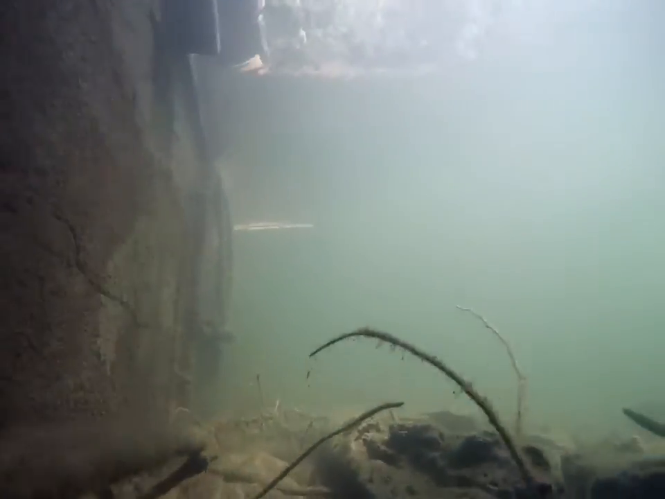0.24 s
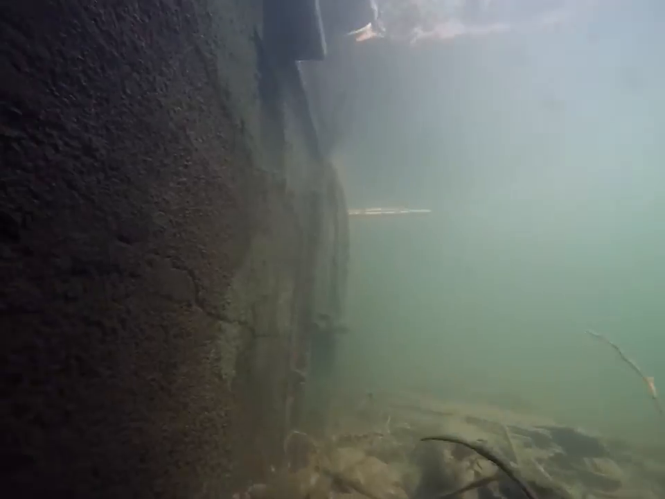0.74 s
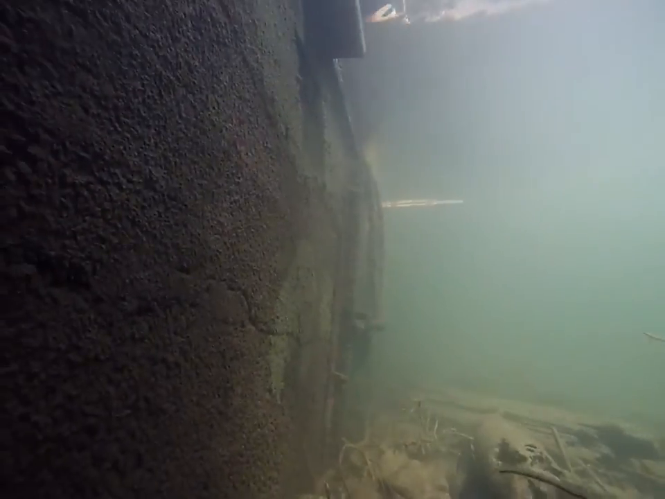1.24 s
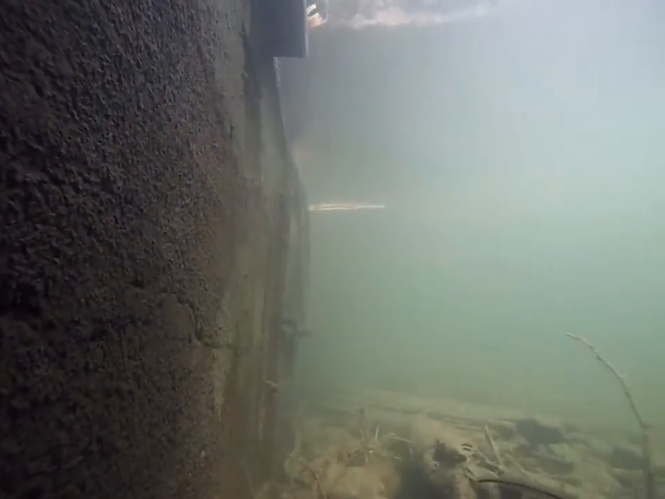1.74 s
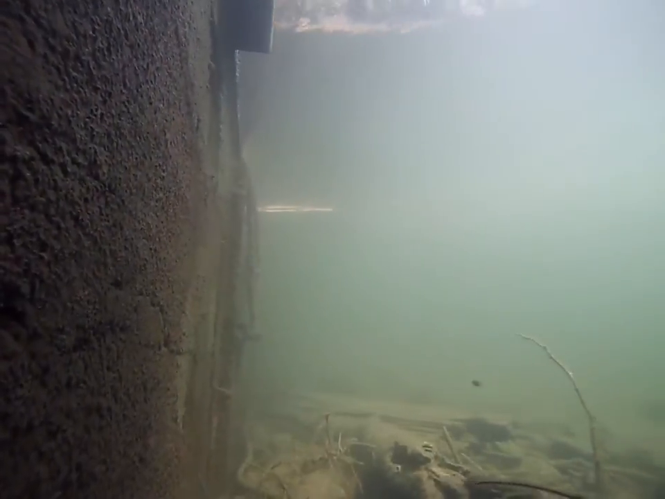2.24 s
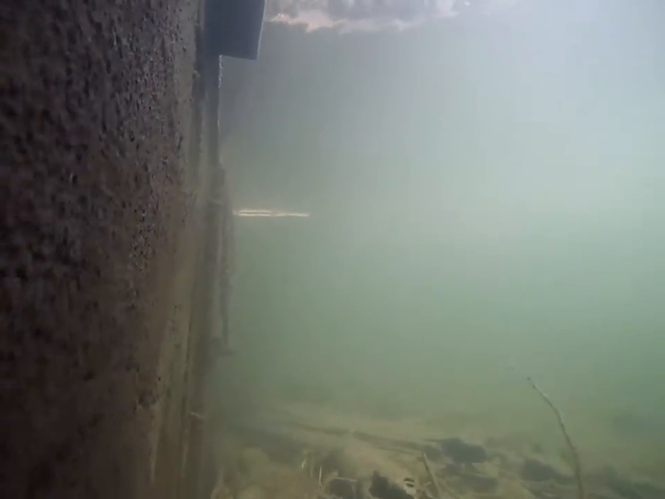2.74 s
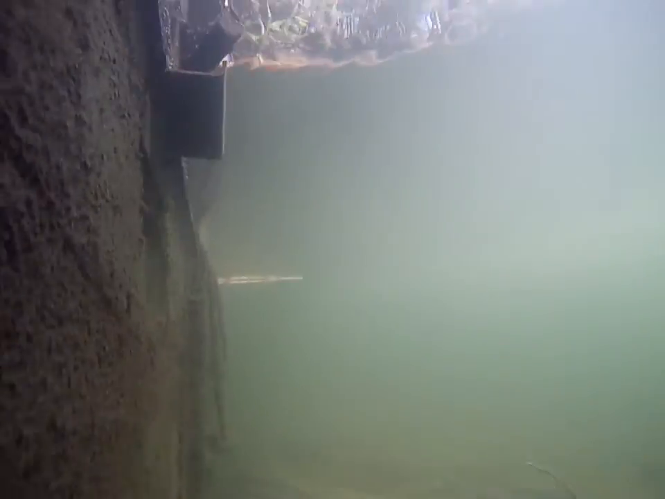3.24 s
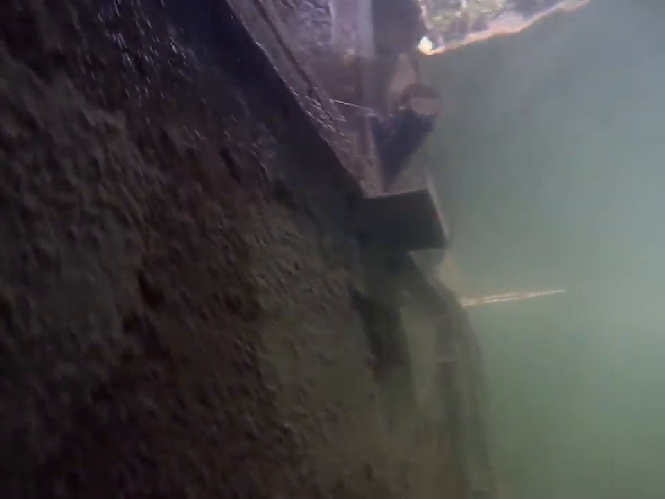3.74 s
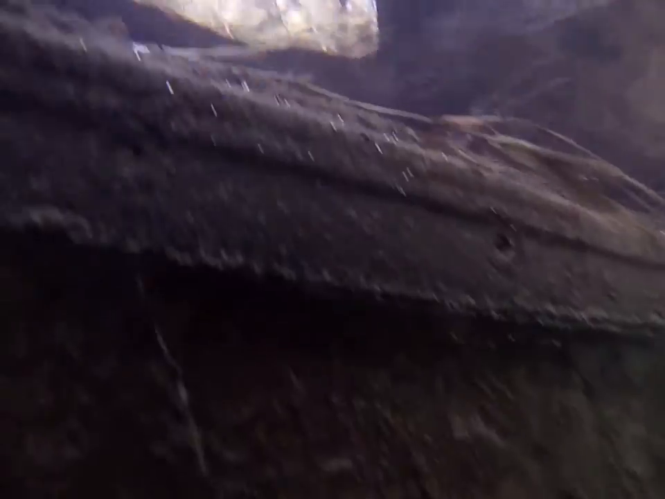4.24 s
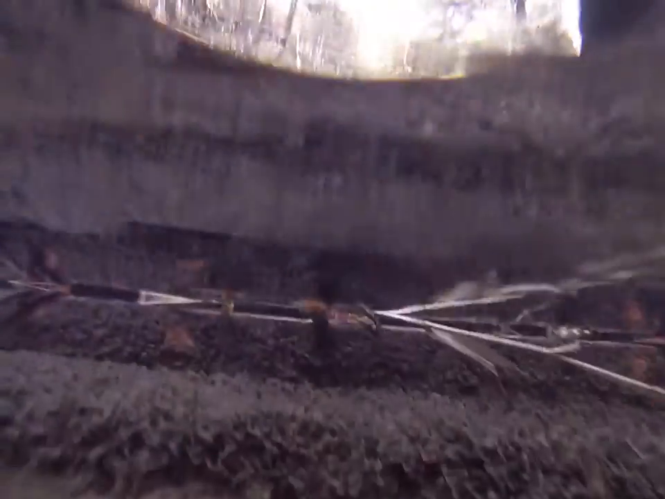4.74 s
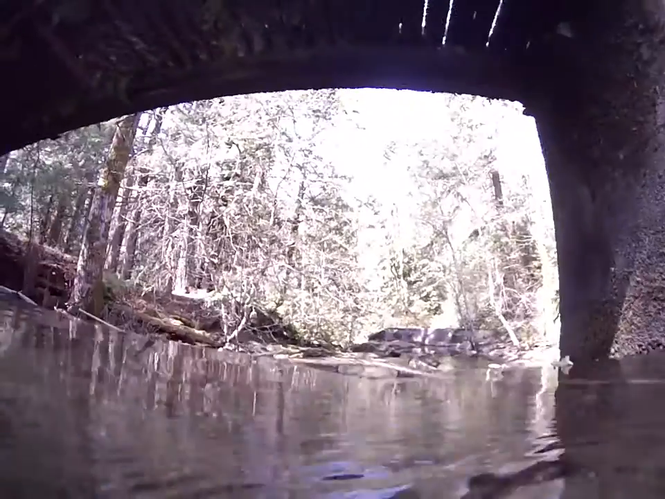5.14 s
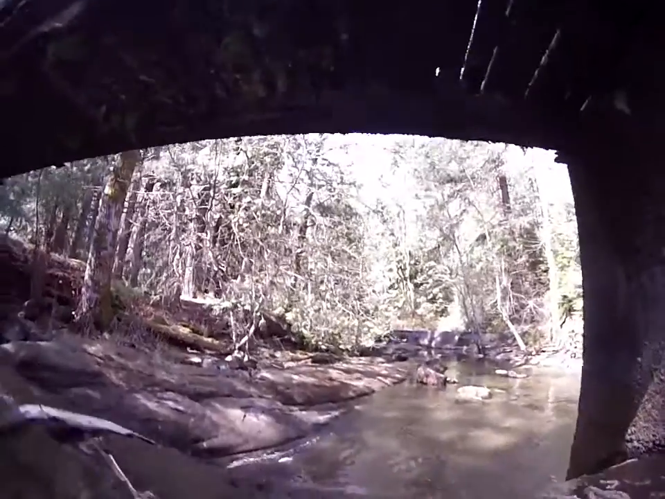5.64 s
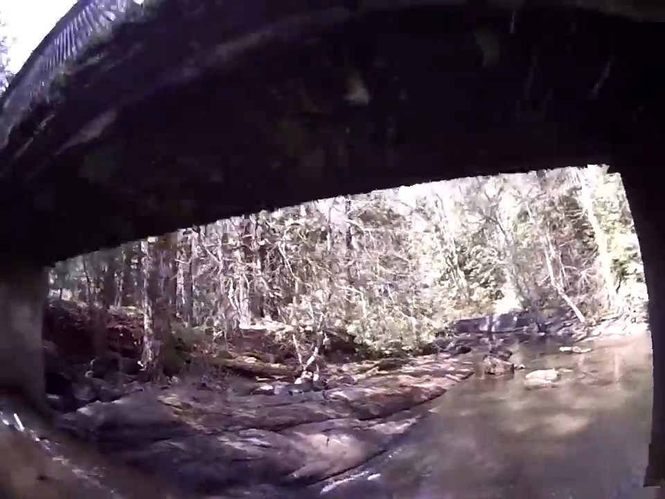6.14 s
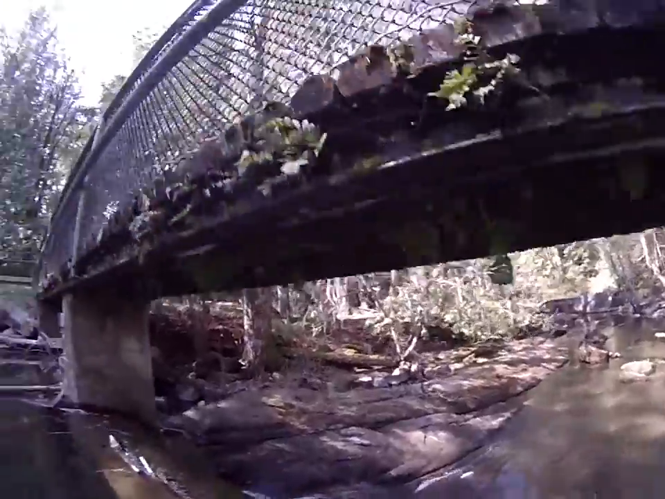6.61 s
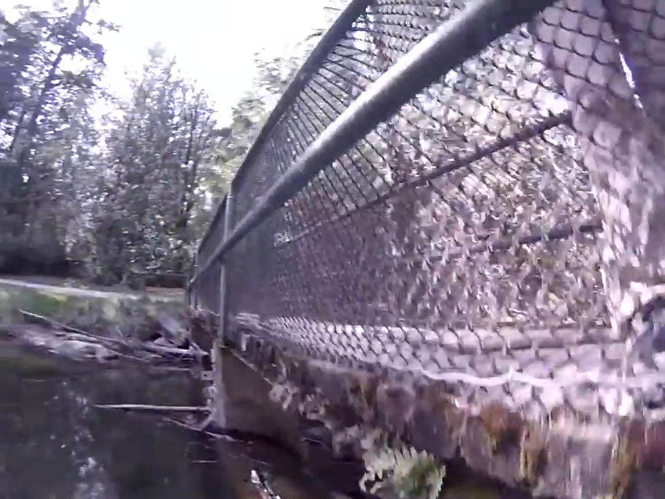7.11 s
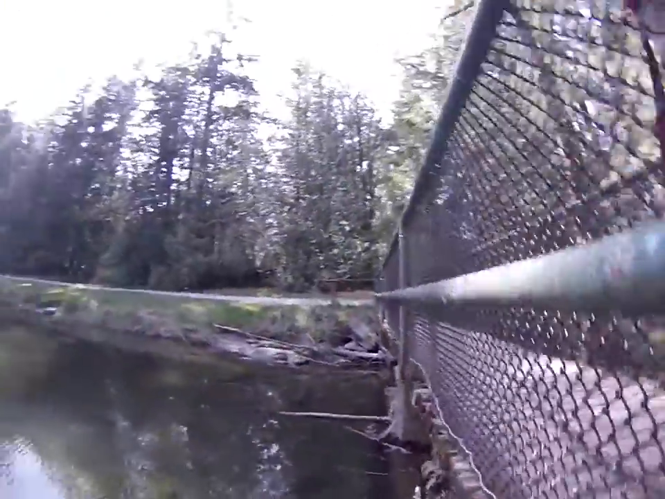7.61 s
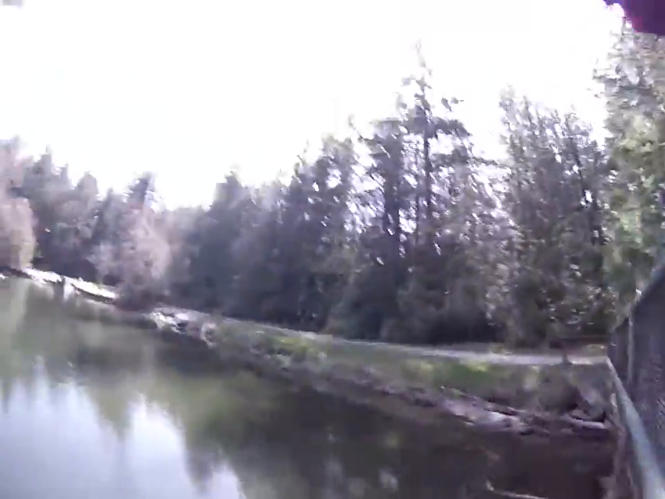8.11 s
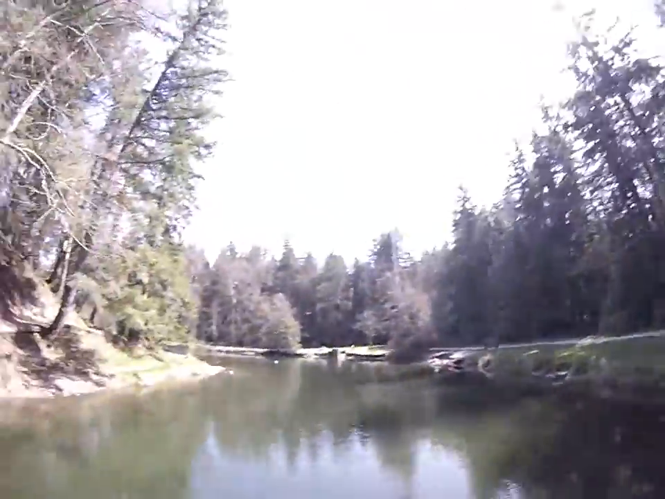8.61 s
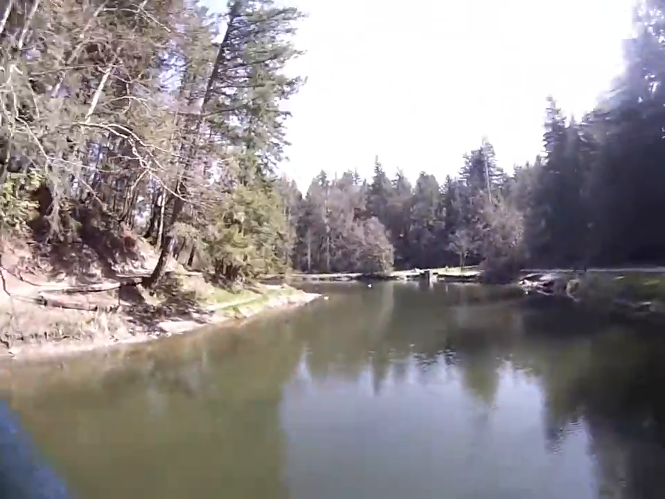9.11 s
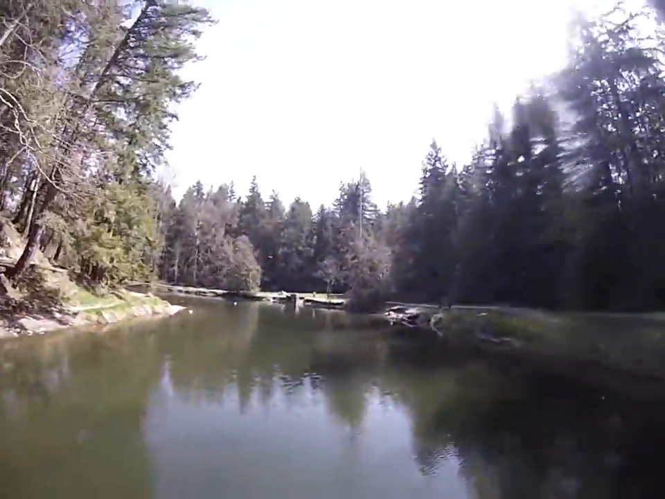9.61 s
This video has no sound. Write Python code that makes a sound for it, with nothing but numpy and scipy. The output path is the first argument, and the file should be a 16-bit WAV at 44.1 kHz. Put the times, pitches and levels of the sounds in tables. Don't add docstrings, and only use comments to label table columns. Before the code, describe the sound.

Heavy thumps on a submerged housing, dull underwater murmur with low pole hum, bubbly chirps and clicks on surfacing, then faint weir hiss and handling knocks.

```python
import sys
import numpy as np
from scipy import signal
from scipy.fft import rfft, irfft, next_fast_len
from scipy.io import wavfile
from scipy.ndimage import uniform_filter1d, map_coordinates

SR = 44100
rng = np.random.default_rng(int(sys.argv[2]) if len(sys.argv) > 2 else 0)


def how_loud(loudness_db):
    steps = np.asarray(loudness_db, float) / 20
    return 10 ** steps


def to_wav(sig):
    pcm = np.clip(np.atleast_2d(sig), -1, 1) * 32767
    pcm = np.round(pcm).astype(np.int16)
    wavfile.write(sys.argv[1], SR, pcm.T)


N = 434804
SURFACE_S, CROSSING_S = 5.02, 0.3

# (f/Hz, width/Hz, level/dB)
SHELL_DRY = [(740, 420, -1.5), (1450, 109, 12.5), (2150, 185, 10), (3278, 330, 12), (3270, 510, 11),
             (4960, 710, -5), (6500, 460, -8.5), (7730, 830, -13), (11000, 6700, -20)]


def unit(x):
    return x / np.sqrt(np.mean(x ** 2) + 1e-20)


def level_curve(rows):
    s, db = np.transpose(rows)
    return how_loud(np.interp(np.arange(N) / SR, s, db))


def filtered(x, response):
    m = next_fast_len(len(x) + min(len(x), 8192))
    hz = np.fft.rfftfreq(m, 1 / SR) + 1e-3
    return irfft(rfft(x, m) * response(hz), m)[:len(x)]


def slope(points):
    f, db = np.transpose(points)
    return lambda hz: how_loud(np.interp(np.log(hz), np.log(f), db))


def resonance(hz, center, width):
    damping = 1j * hz * width
    return damping / (center * center - hz * hz + damping)


def modes(table):
    return lambda hz: sum((-1) ** k * how_loud(db) * resonance(hz, center, width)
                          for k, (center, width, db) in enumerate(table))


def add(track, s, x):
    x = x[max(-round(s * SR), 0):]
    part = track[max(round(s * SR), 0):][:len(x)]
    part += x[:len(part)]


def ring(hz, t60, attack, glide=0):
    t = np.arange(SR // 5 if t60 > .033 or hz < 400 else SR // 16) / SR
    turns = hz * (t + glide * 0.0036 * (1 - np.exp(-t / 0.0089)))
    return np.sin(2 * np.pi * turns) * how_loud(-60 * t / t60) * (1 - np.exp(-t / attack))


def rush(response, band, patchy_db):
    z = signal.stft(rng.standard_normal(N + 512), nperseg=512)[2]
    field = uniform_filter1d(rng.standard_normal(z.shape), size=5, axis=0)
    field = uniform_filter1d(field, size=10, axis=1)
    patchy = signal.istft(z * how_loud(patchy_db * unit(field)), nperseg=512)[1][:N]
    x = filtered(patchy, response)
    return x / np.std(filtered(x, lambda hz: (hz > band[0]) & (hz < band[1])))


def steadied(x, span):
    power = np.abs(uniform_filter1d(x * x, size=int(span * SR)))
    return unit(x / np.sqrt(power + 1e-9))


def above():
    return .5 + .5 * np.tanh((np.arange(N) / SR - SURFACE_S) / CROSSING_S)


def ducking():
    # (t/s, depth/dB, recovery/s)
    drops_in_gain = [
        (0.102, -19, 0.081),
        (8.722, -2.5, 0.14),
        (9.528, -11.5, 0.089),
    ]
    t, gain_db = np.arange(N) / SR, np.zeros(N)
    for s, db, recovery in drops_in_gain:
        gain_db += db * (t > s) * np.exp(-(np.maximum(t - s, 0) / recovery) ** 2)
    return how_loud(gain_db)


def water():
    # (t/s, level/dB)
    pond_levels = [(0.2, -49.5), (1.27, -51), (2.28, -50.5), (2.83, -49.5), (3.57, -48), (4.5, -53.5),
                   (4.62, -56), (4.85, -60.5)]
    weir_levels = [(4.85, -48), (5.36, -52), (8.73, -59.5), (8.95, -50), (9.61, -56), (9.86, -56)]
    # (f/Hz, level/dB)
    pond_color = [(180, -31), (300, -12.5), (442, -10.5), (712, -3), (818, -14.5), (950, -9.5),
                  (1090, -15.5), (1220, -23.5), (1350, -19), (1610, -22), (2120, -20.5), (2690, -30),
                  (6000, -42.5), (7800, -63), (13200, -120)]
    weir_color = [(180, -64), (300, -26), (406, -15), (543, -8.5), (636, -11), (755, -11.5), (995, -12),
                  (1480, -0.5), (1850, -8.5), (2340, -4.5), (2820, -16), (3570, -12), (4190, -18.5),
                  (7000, -28.5), (9100, -39), (15400, -120)]
    hiss_color = [(2500, -59), (4500, -8.5), (5800, -4), (7000, -10), (10200, -10), (12000, -14),
                  (15000, -20), (16000, -69)]
    pond = level_curve(pond_levels) * rush(slope(pond_color), (500, 1100), patchy_db=1.1)
    weir = level_curve(weir_levels) * rush(slope(weir_color), (1200, 2600), patchy_db=0.8)
    hiss = how_loud(-74.5) * rush(slope(hiss_color), (5000, 15000), patchy_db=1.2)
    return ducking() * ((1 - above()) * pond + above() * weir + hiss)


def hands():
    # (t/s, length/s, tremor level/dB, play level/dB)
    hauls = [
        (0.99, 0.84, -44.5, -49),
        (2.33, 0.92, -40.5, -44),
        (3.317, 1.28, -42.5, -54),
        (5.09, 0.75, -34.5, -51.5),
        (6.64, 0.41, -46, -87),
        (7.202, 0.55, -37, -47.5),
        (8.186, 0.21, -50, -71),
        (8.752, 0.73, -41, -49),
        (9.64, .4, -33, -38),
    ]
    rest_wet_db, rest_dry_db = (-53.5, -52.5), (-45, -65.5)
    take_up_s = 0.09
    t = np.arange(N) / SR
    levels = np.outer(how_loud(rest_wet_db), 1 - above()) + np.outer(how_loud(rest_dry_db), above())
    for s, length, *db in hauls:
        strain = (np.tanh((t - s) / take_up_s) - np.tanh((t - s - length) / take_up_s)) / 2
        levels += how_loud(db)[:, None] * strain
    return 20 * np.log10(levels)


def jolts():
    # (t/s, peak level/dB, f/Hz, width/s)
    shakes = [(1.087, -30, 82, 0.029), (1.211, -31.5, 82, 0.039), (1.369, -32, 82, 0.085),
              (1.621, -25.5, 81, 0.0067), (1.708, -23.5, 84.8, 0.079), (2.49, -26, 63, 0.063),
              (2.547, -19, 88.5, 0.039), (2.797, -29.5, 72, 0.065), (2.951, -26, 79, 0.03),
              (3.016, -30, 112, 0.0096), (3.139, -28, 83.6, 0.025), (3.55, -26.5, 78, 0.017),
              (3.717, -23.5, 132, 0.013), (4.137, -31.5, 90, 0.06), (4.405, -27, 60.5, 0.062),
              (4.605, -30, 72.1, 0.035), (5.234, -24, 79.3, 0.057), (5.294, -24.5, 91.4, 0.11),
              (5.433, -20, 117.5, 0.028), (5.545, -24.5, 110, 0.047), (5.608, -29.5, 122, 0.043),
              (5.747, -19, 101, 0.045), (6.689, -27, 99, 0.033), (6.907, -28.5, 97, 0.036),
              (7.238, -33.5, 108.7, 0.076), (7.343, -30.5, 104, 0.09), (7.727, -25.5, 104, 0.056),
              (8.05, -28, 82, 0.015), (8.89, -28, 98, 0.03), (9.298, -28, 106, 0.043)]
    # (t/s, peak level/dB, f/Hz)
    lurches = [(0.339, -37, 52), (0.859, -35.5, 75), (0.929, -36, 89), (2.801, -22.5, 39),
               (3.408, -27.5, 39), (5.292, -22, 27), (5.398, -22, 10), (5.519, -36, 12), (6.737, -21.5, 42),
               (6.819, -26, 30), (6.834, -30, 99), (6.907, -29, 31), (7.208, -28, 29), (9.093, -27, 11),
               (9.215, -28.5, 102), (9.341, -27, 21), (9.42, -28, 25), (9.579, -24, 95), (9.705, -26, 32),
               (9.736, -29, 120), (9.786, -21.5, 120)]
    # (t/s, peak level/dB, f/Hz, width/s)
    sings = [(1.1, -48, 410, 0.091), (1.27, -44, 412, 0.098), (1.4, -45.5, 410, 0.065),
             (1.53, -46, 408, .04), (1.62, -47, 410, 0.037), (1.85, -37, 80, .06), (2.3, -39, 85, .05),
             (2.44, -46.5, 420, .08), (2.55, -45, 416, .05), (2.69, -40, 232, .05), (2.78, -40.5, 239, .06),
             (2.96, -42, 241, 0.034), (3.2, -44, 235.2, 0.049), (9.26, -28, 299, 0.031),
             (9.33, -26, 14, .08)]
    lurch_s = 0.031
    events = shakes + [(*row, lurch_s) for row in lurches] + sings
    out, effort, t = np.zeros(N), np.zeros(N), np.arange(-SR // 5, SR // 5) / SR
    for s, db, hz, width in events:
        swell = np.exp(-(t / (0.54 * width)) ** 2)
        tone = np.sin(2 * np.pi * (hz * t + rng.random()))
        add(out, s - .2, how_loud(db) * swell * tone)
        add(effort, s - .2, swell)
    return out, effort


def pole():
    # (f/Hz, level/dB)
    sway_color = [(8, -39), (18, 10), (30, 10), (55, -5), (70, 9), (90, -71)]
    # (f/Hz, width/Hz, level/dB)
    modes_wet = [(136, 39, 0.5), (248, 52, 1), (330, 30, -5.5), (410, 36, 0.5)]
    modes_dry = [(155, 47, -1.5), (174, 32, -11.5), (284, 30, -3), (450, 210, -44)]

    def rattling(table):
        return rush(lambda hz: modes(table)(hz) / (1 + (130 / hz) ** 8) / (1 + (hz / 480) ** 8),
                    (150, 450), patchy_db=3.5)

    tremor_db, play_db = hands()
    jerks_per_s = 14
    jerks_db = 3 * map_coordinates(rng.standard_normal(200), [np.arange(N) * jerks_per_s / SR])
    sway = steadied(rush(slope(sway_color), (20, 60), patchy_db=0), span=.25)
    sway_db = -43.5 + 0.67 * (tremor_db + 42) + 1.05 * jerks_db
    hum = rush(lambda hz: resonance(hz, 92, 45) ** 2, (62, 140), patchy_db=1.5)
    hum_db = tremor_db - 2.5 + jerks_db
    shaking, effort = jolts()
    rattle = (1 - above()) * rattling(modes_wet) + above() * rattling(modes_dry)
    rattle_db = play_db - 3.5 + 0.25 * jerks_db + 0.65 * np.minimum(effort, 1)
    return how_loud(sway_db) * sway + how_loud(hum_db) * hum + how_loud(rattle_db) * rattle + shaking


def knocks():
    # (t/s, peak level/dB, f/Hz, t60/s)
    hollow_knocks = [(.0085, -10.5, 83.6, 0.14), (.056, -6, 225, 0.052), (0.114, -20, 220, 0.1),
                     (.05, -14, 635, .03), (.114, -15.5, 630, 0.028), (.115, -15, 930, 0.022),
                     (9.414, -43, 297, 0.11), (9.678, -39, 330, 0.068), (9.83, -16.5, 400, 0.042),
                     (0.056, -6.5, 309, 0.037), (.05, -10.5, 460, 0.022), (0.111, -17.5, 374, .04),
                     (2.252, -31, 662, 0.034), (2.465, -37.5, 243.4, 0.23), (3.664, -22.5, 430, 0.059),
                     (3.672, -28, 433, 0.026), (3.686, -28, 470, 0.048), (3.691, -32, 765, .03),
                     (3.699, -23, 357, 0.042), (3.701, -24.5, 660, 0.037), (3.712, -22.5, 420, 0.035),
                     (3.72, -29, 595, 0.029), (4.846, -36, 1680, 0.021), (5.722, -35.5, 278, 0.1),
                     (5.817, -33, 1475, 0.016), (5.978, -31.5, 1450, 0.01), (6.673, -37, 284, 0.059),
                     (7.436, -30, 185, 0.12), (7.5676, -23.5, 2120, 0.019), (7.5675, -54, 5000, .015),
                     (7.71, -39, 299.7, 0.1), (8.7203, -11, 480, 0.008), (5.075, -42, 245, .09),
                     (5.13, -39, 245, .08), (5.24, -42, 228, .07), (5.31, -42, 275, .09),
                     (5.385, -41, 280, .06), (5.47, -42, 270, .07), (5.6, -43, 300, .08),
                     (5.77, -46, 470, .05), (9.526, -26, 169, 0.013)]
    out = np.zeros(N)
    for s, db, hz, t60 in hollow_knocks:
        add(out, s, how_loud(db + 7.5) * ring(hz, t60, attack=1.92 / hz))
    return out


def drops():
    # (t/s, peak level/dB, f/Hz)
    grains = [(0.051, -43.5, 9350), (0.066, -40, 10500), (.0845, -38, 3000), (0.115, -34, 6500),
              (0.1136, -51, 10600), (.125, -44, 6000), (.125, -62, 10000), (9.7587, -37, 11000),
              (9.765, -35, 6000), (3.5994, -40.5, 5800), (3.881, -49, 8900), (4.51, -49.5, 9100),
              (4.545, -32.5, 4100), (4.674, -33, 4600), (4.8162, -29, 4000), (4.934, -47, 13300),
              (4.933, -29, 2400), (5.0245, -46, 10900), (5.047, -46, 5830), (5.202, -34.5, 5400),
              (6.8657, -65, 12000), (7.059, -51, 11000), (3.601, -43, 4300), (5.025, -36, 3900),
              (4.933, -38, 4600), (3.39, -40, 4900), (9.534, -42, 5000)]
    out, t = np.zeros(N), np.arange(SR // 50) / SR
    for s, db, hz in grains:
        grain = rng.standard_normal(len(t)) * how_loud(-60 * t / 0.0038)
        add(out, s, how_loud(db + 9.5) * filtered(grain, modes([(hz, 0.11 * hz, 0)])))
    return out


def bubbles():
    # (t/s, peak level/dB, f/Hz, t60/s, share of pitch gained in that time)
    air_pockets = [
        (3.7623, -14, 1175, .036, .25),
        (3.8768, -15.5, 1620, .024, .12),
        (3.8759, -16.5, 2560, .03, .03),
        (4.039, -25, 2470, .018, .03),
        (4.5442, -25, 710, .035, .1),
        (4.674, -36, 705, 0.049, .1),
        (4.8145, -25, 710, .045, .1),
    ]
    out = np.zeros(N)
    for s, db, hz, t60, rise in air_pockets:
        life = np.arange(SR // 10) / SR / t60
        turns = hz * t60 * (life + rise * life ** 2 / 2)
        add(out, s, how_loud(db - 60 * life) * np.sin(2 * np.pi * turns) * (1 - np.exp(-turns)))
    return out


def ticks():
    # (t/s, peak level/dB, low mode f/Hz, high mode f/Hz, t60/s)
    creaks = [(0.2515, -16.5, 847.7, 1654, 0.032), (3.8174, -25.5, 1600, 2030, 0.021),
              (3.851, -45, 2260, 3220, 0.014), (3.8762, -13.5, 1780, 2480, 0.015),
              (4.5315, -44, 1535, 2000, 0.019), (4.545, -24, 1400, 1690, 0.02),
              (4.6729, -21, 720, 1520, 0.012), (4.8137, -22, 1430, 1680, 0.02),
              (4.9878, -24.5, 1340, 2050, 0.0042), (5.127, -31.5, 2010, 2740, 0.012),
              (5.204, -32.5, 861, 1570, 0.031), (5.341, -36, 1570, 3100, 0.02),
              (5.3771, -35, 1530, 2150, 0.017), (8.7207, -2.5, 2065, 2930, 0.012)]
    # (t/s, peak level/dB, f/Hz, t60/s)
    snaps = [(.0415, -18, 2070, 0.016), (9.537, -30, 2200, 0.009), (3.391, -15, 1900, 0.0079),
             (3.7628, -24, 2050, 0.011), (4.037, -9, 2430, 0.006), (4.209, -26, 1300, 0.0048),
             (4.0374, -9.5, 1170, 0.0039), (4.294, -31.5, 2060, 0.01), (4.4216, -22.5, 2000, 0.0069),
             (4.5094, -23.5, 1600, 0.0062), (7.4335, -21, 1300, .005), (8.1866, -17.5, 2530, 0.0064),
             (8.721, -3, 1180, 0.006), (8.7209, 5, 2080, 0.013), (8.7212, -3, 4450, .008),
             (4.0378, -17, 3150, 0.009), (4.846, -30, 900, 0.012)]
    out, t = np.zeros(N), np.arange(SR // 50) / SR
    lows = [(s, db, hz, t60) for s, db, hz, _, t60 in creaks]
    highs = [(s, db + 5, hz, 0.62 * t60) for s, db, _, hz, t60 in creaks]
    for s, db, hz, t60 in lows + highs + snaps:
        add(out, s, how_loud(db - 7.0) * ring(hz, t60, attack=0.00048))
        add(out, s, how_loud(db - 1.4) * ring(hz * 1.005, t60 * 0.51, attack=0.00075))
    for s, db, *_ in highs + snaps:
        burst = rng.standard_normal(len(t)) * how_loud(-60 * t / 0.012)
        crack = filtered(burst, lambda hz: modes(SHELL_DRY)(hz) / (1 + (hz / 4000) ** 3))
        add(out, s, how_loud(db - 12.0) * crack)
    return out


def rubs():
    # (t/s, length/s, rms level/dB, tilt/dB per octave, wall under the finger f/Hz)
    pushes = [
        (0.049, 0.024, -22, -7, 560),
        (3.377, 0.024, -39, -10, 740),
        (7.373, 0.21, -47, -18, 1450),
        (7.524, 0.19, -42.5, -20, 1450),
        (8.7205, 0.003, -26, 1, 6300),
        (8.743, 0.056, -38, -10, 1450),
        (8.842, 0.052, -27, -1, 4500),
        (9.605, 0.056, -43, -20, 1900),
        (9.675, 0.05, -37, -14, 1300),
    ]
    slides = [(-.02, 0.09, -32, -3.5, 1940), (0.048, 0.019, -19, -8, 690), (0.07, 0.038, -56, -9, 1450),
              (0.121, 0.013, -27, -15, 1500), (7.665, 0.081, -60, -7, 1910), (8.722, 0.011, -36, -7, 3300),
              (8.823, 0.0715, -22, -0.5, 2540), (8.913, 0.012, -43, -2, 1300),
              (9.526, 0.004, -40, 3.5, 6000), (9.675, 0.0087, -37, -12, 2200),
              (9.729, 0.024, -35, -10, 2240), (9.758, 0.0065, -32, 1.5, 2680),
              (9.7645, 0.006, -21, -5, 850), (9.77, 0.06, -34, -4, 600), (9.8263, .0015, -8.5, -8, 8040),
              (9.83, 0.004, -19, -3, 2000), (9.828, 0.024, -31, 2, 3500), (8.826, 0.022, -26, -8, 900),
              (9.067, 0.026, -24.5, -8, 1700), (9.192, 0.026, -32.5, -6, 2200),
              (9.8263, 0.0057, -14.5, -3.5, 1200), (.07, 0.013, -33, -13, 1200),
              (8.727, .026, -34, -8, 2100), (8.827, .022, -28, -2, 4800), (9.685, .06, -50, 2, 7000),
              (8.816, .012, -45, -14, 1500)]
    wipes = [(.108, .018, -15.5, -7, 840), (7.3, 0.42, -45.5, -18, 1190), (8.942, 0.076, -30, -4, 2340),
             (8.995, 0.038, -36, -5, 1900), (9.031, 0.026, -35.5, -5, 1900), (9.056, 0.03, -31, -11, 1800),
             (9.068, 0.036, -23, -9, 1800), (9.087, 0.018, -30, -4, 1280), (9.095, 0.045, -37, -5, 2600),
             (9.125, 0.075, -35.5, -9, 2000), (9.185, 0.06, -32, -12, 2200), (9.187, 0.05, -31, -14, 4600),
             (9.228, .055, -35.5, -9, 2360), (9.27, .04, -46, -12, 2200), (9.311, 0.052, -46.5, -10, 2110),
             (9.38, 0.064, -47, -12, 1900), (9.678, 0.094, -34, -12, 786), (7.37, 0.1, -46, -20, 800),
             (7.5, 0.19, -50, -23, 810), (7.66, .08, -44.5, -15, 646), (7.67, 0.05, -46, -18, 2200),
             (9.69, 0.087, -38, -17, 450), (9.77, 0.064, -40, -20, 450), (.1, 0.02, -42, -8, 700),
             (8.955, .04, -32, -14, 1450), (9.065, .045, -37, -10, 4600), (9.135, .05, -44, -10, 4500),
             (9.225, .04, -44, -10, 4600), (9.235, .05, -42, -20, 650), (9.685, .065, -34, -10, 1900),
             (9.685, .08, -32, -25, 280), (9.825, .04, -24, -20, 300), (9.8258, .003, -17, 0, 11500),
             (9.828, .025, -40, 0, 11300), (9.7645, .005, -44, 0, 11300), (7.44, .24, -48, -22, 1950),
             (9.6, .1, -47, -25, 750)]
    # (f/Hz, width/Hz, level/dB)
    shell_wet = [(630, 190, 3), (920, 200, 1.5), (1520, 190, 7), (2200, 154, 8), (3380, 250, 2),
                 (4830, 960, -11), (6500, 670, -9), (7600, 660, -15), (11000, 5400, -22)]
    strokes = ([(*row, 0.8, 0.59) for row in pushes] + [(*row, 0.13, 0.59) for row in slides]
               + [(*row, 0.5, 1.01) for row in wipes])
    out, grid_hz = np.zeros(N), np.linspace(1, SR / 2, 2000)
    for s, length, db, tilt, patch_hz, rise, soft in strokes:
        slips = uniform_filter1d(rng.standard_normal(SR // 4), size=70)
        slips = unit(uniform_filter1d(slips, size=70))
        slip_db = 3.2 * min(length / .05, 1)
        grit = unit(rng.standard_normal(SR // 4) * how_loud(slip_db * slips))
        grit = grit[:int(SR * length) + 1024]
        u = np.arange(len(grit)) / (SR * length)
        stroke = np.clip(np.minimum(u / rise, (1 - u) / (1 - rise)), 0, 1) ** soft

        def wall(hz):
            return how_loud(tilt * np.log2(np.maximum(hz, 1400) / 2000)) / (1 + (hz / 12000) ** 10)

        def shell(hz):
            if s < SURFACE_S:
                return modes(shell_wet)(hz)
            return modes(SHELL_DRY)(hz) / (1 + (900 / hz) ** 2)

        def color(hz):
            patch = resonance(hz, patch_hz, min(.7 * patch_hz, 1800)) ** 3
            return shell(hz) * wall(hz) + how_loud(8.0) * wall(patch_hz) ** .5 * patch

        color_rms = np.linalg.norm(color(grid_hz)) / np.sqrt(len(grid_hz))
        add(out, s, how_loud(db) * filtered(grit * stroke, color) / color_rms)
    return out


def blows():
    # (t/s, peak level/dB, f/Hz, t60/s, direction +1 or -1)
    hits = [(0.0506, 5, 105, 0.011, 1), (0.064, 6.5, 57.6, 0.026, -1), (-.003, -12, 70, .05, -1),
            (.078, -8, 60, .025, 1), (0.086, -7.5, 62.5, 0.11, -1), (0.135, -11, 79, 0.12, -1),
            (4.204, -12, 62, 0.14, -1), (5.151, -19.5, 80, 0.22, -1), (8.7211, -2, 102.5, 0.063, -1),
            (8.8275, -9.5, 100, .1, -1), (8.838, -10.5, 100, 0.099, -1), (8.8395, -14, 250, 0.0093, -1),
            (9.5305, -3, 55, 0.035, 1), (9.554, -14.5, 86, 0.065, -1), (9.6755, -15, 56, 0.08, -1),
            (9.765, -13, 110, 0.042, 1), (9.776, -14.5, 104, 0.21, -1), (9.829, 0.5, 187, 0.017, -1),
            (9.835, -6.5, 48, 0.23, -1), (9.8385, -1.5, 170, 0.01, -1), (9.852, -0.5, 105, 0.043, 1)]
    # (t/s, peak level/dB, f/Hz, t60/s, attack/s)
    nudges = [
        (8.9146, 9, 92, .04, .011),
        (9.5243, 15, 100, .02, .005),
    ]
    out = np.zeros(N)
    for s, db, hz, t60, direction in hits:
        add(out, s, direction * how_loud(db) * ring(hz, t60, attack=0.001, glide=0.18))
    for s, db, hz, t60, attack in nudges:
        add(out, s, -how_loud(db) * ring(hz, t60, attack))
    return out


def scene():
    mix = water() + pole() + knocks() + drops() + bubbles() + ticks() + rubs() + blows()
    return mix[None]


def band_limit(x):
    return signal.sosfilt(signal.butter(12, 15200, fs=SR, output="sos"), x)


def record(dry):
    mix = dry / (1 + np.abs(dry) ** 8) ** (1 / 8)
    return band_limit(mix)


dry = scene()
out = record(dry)
to_wav(out)
```